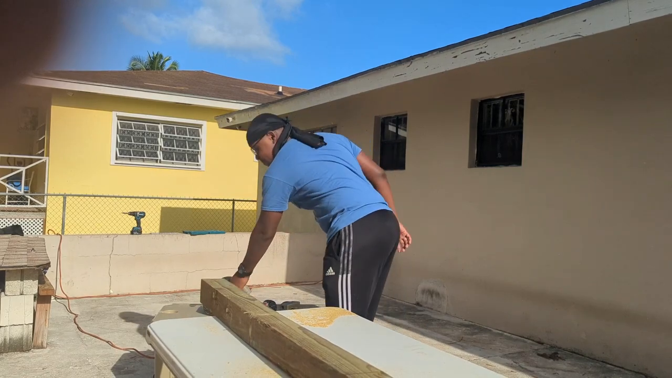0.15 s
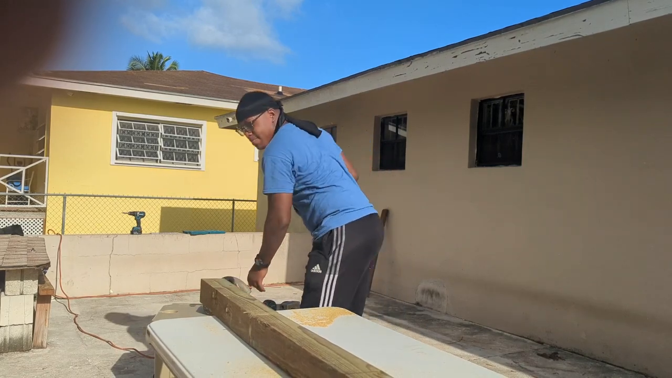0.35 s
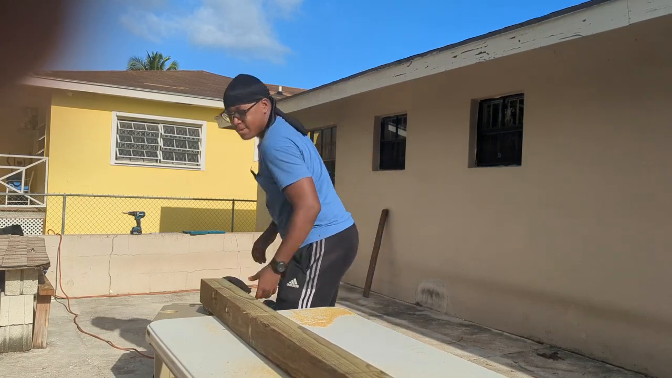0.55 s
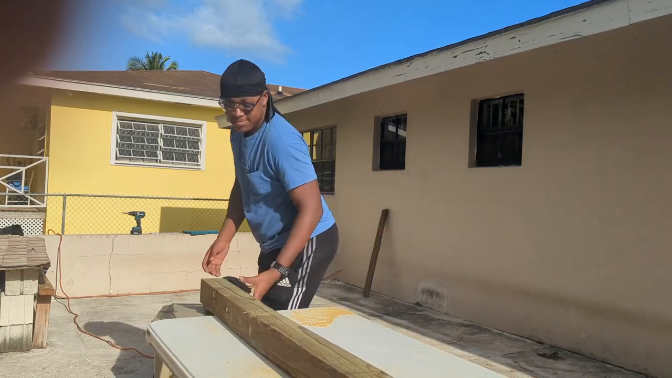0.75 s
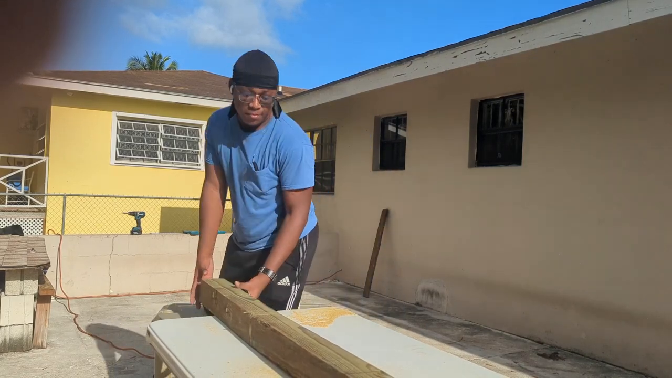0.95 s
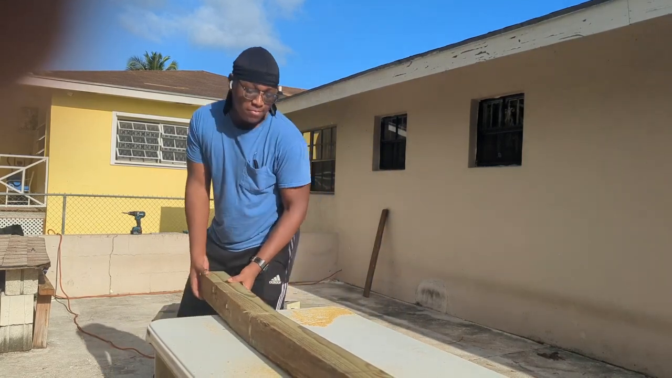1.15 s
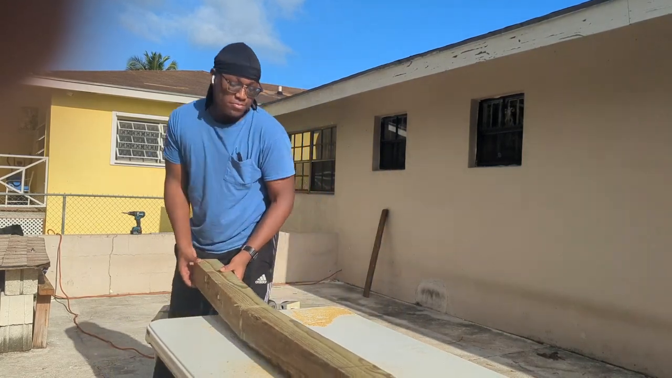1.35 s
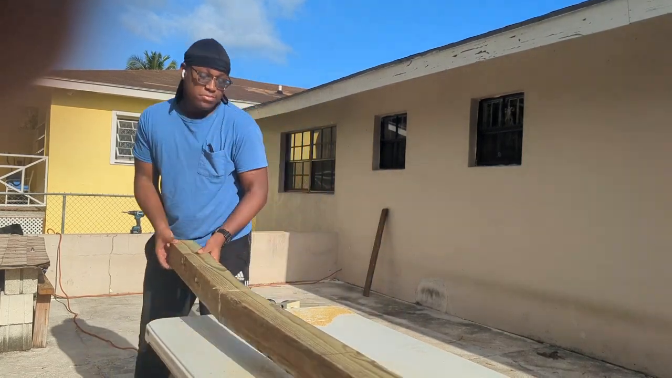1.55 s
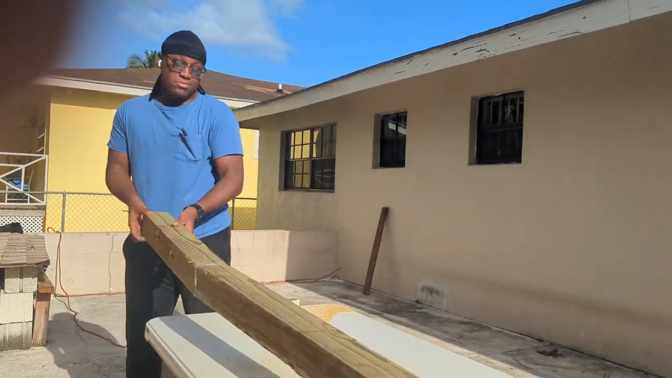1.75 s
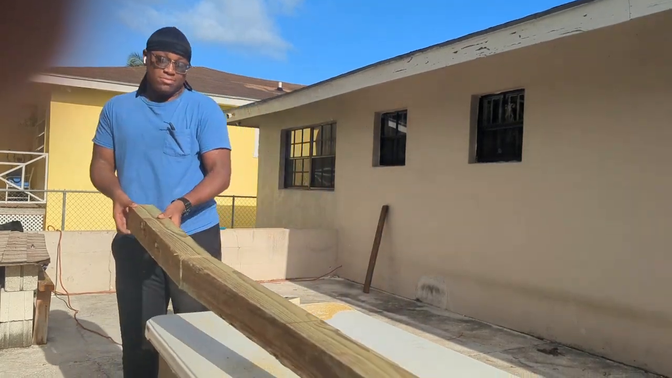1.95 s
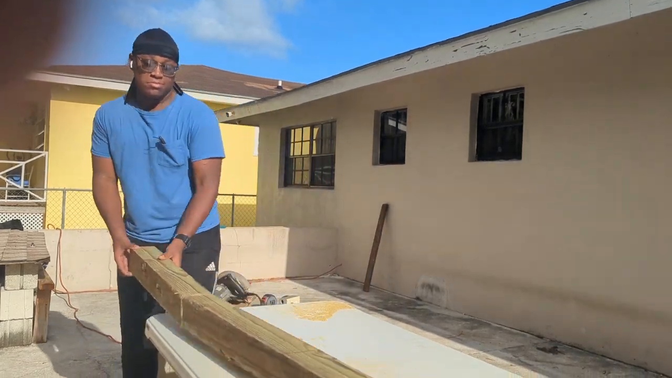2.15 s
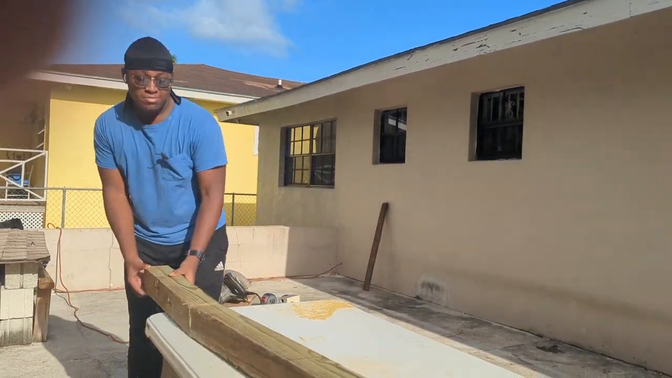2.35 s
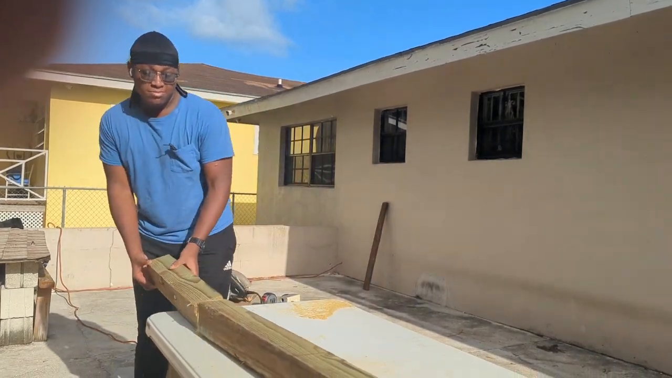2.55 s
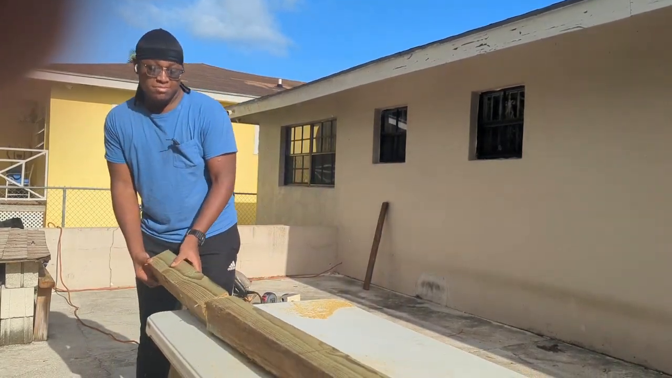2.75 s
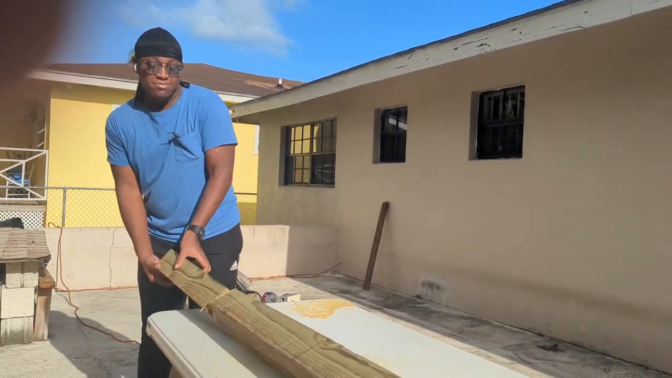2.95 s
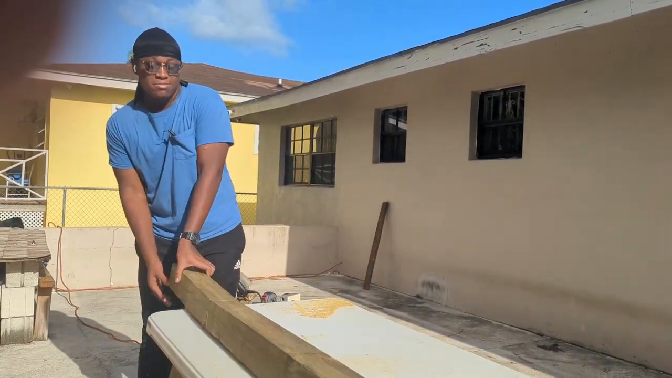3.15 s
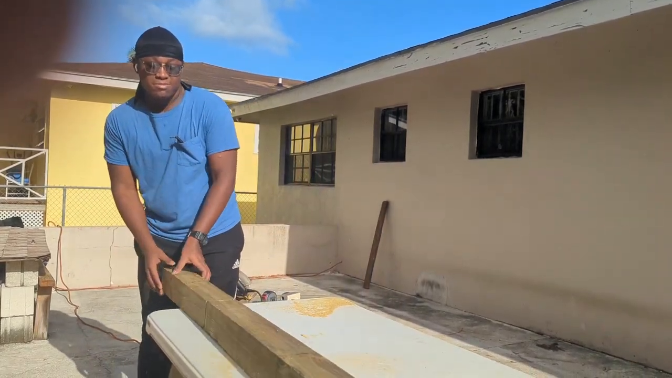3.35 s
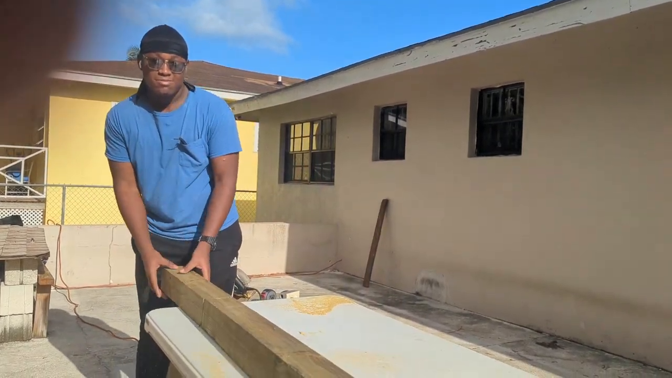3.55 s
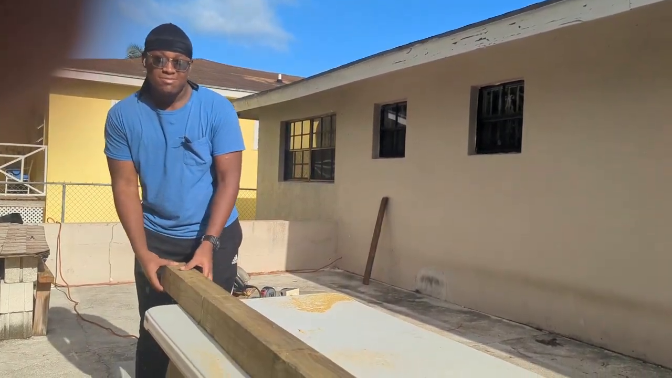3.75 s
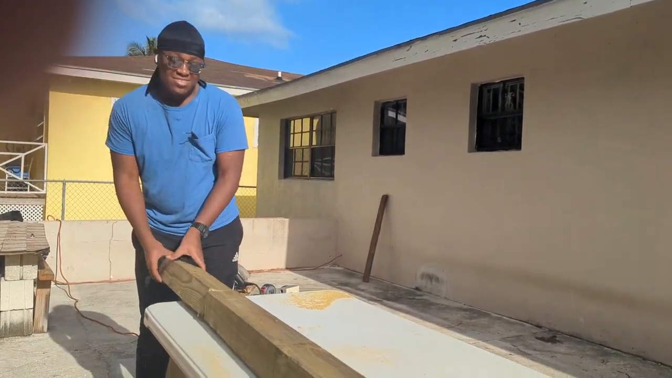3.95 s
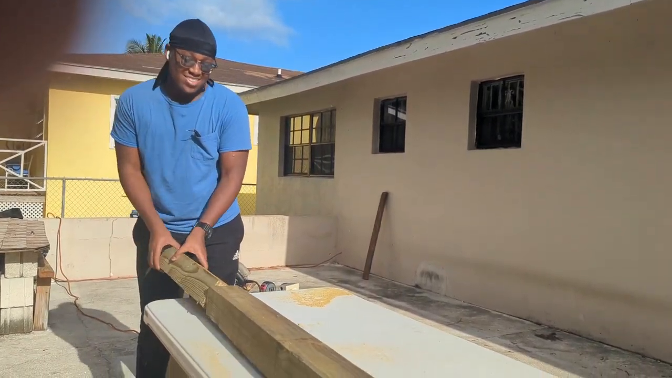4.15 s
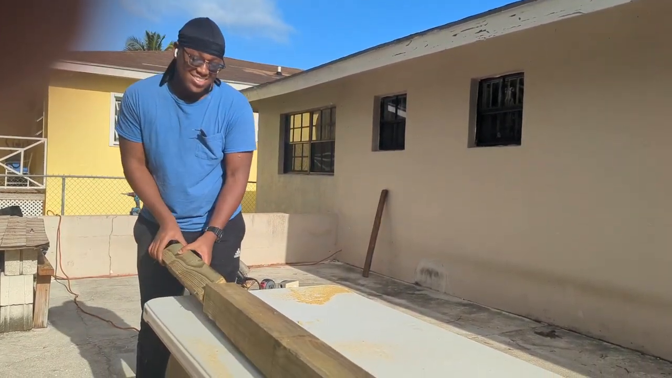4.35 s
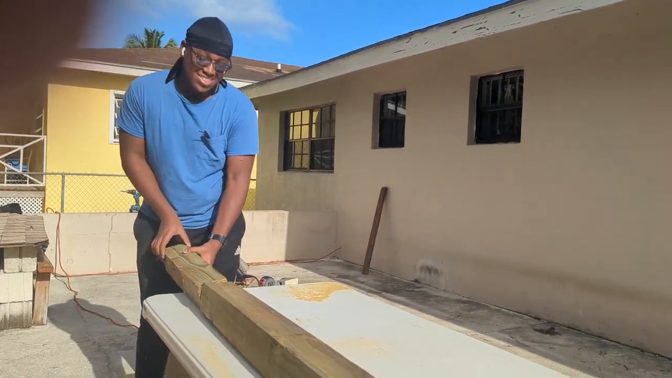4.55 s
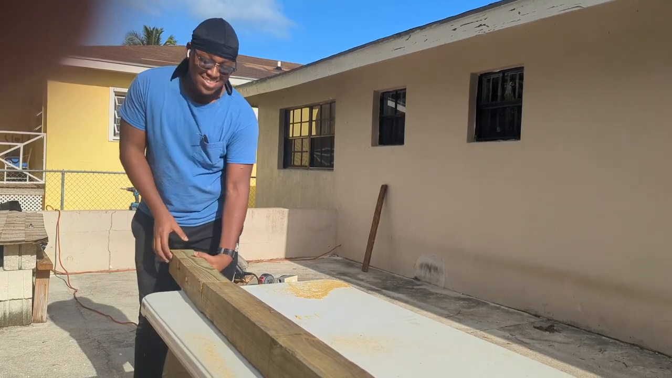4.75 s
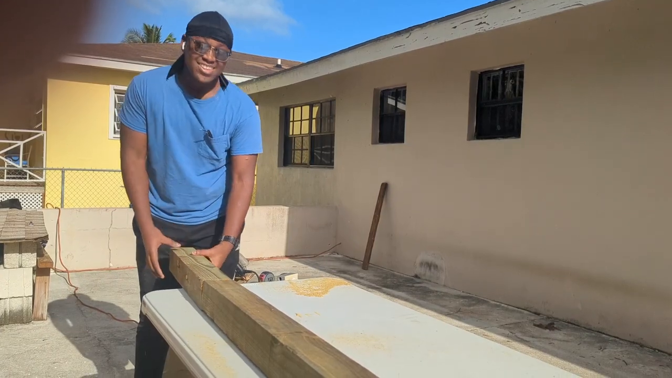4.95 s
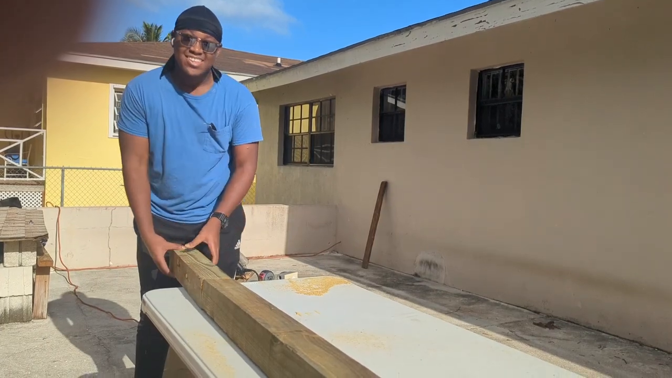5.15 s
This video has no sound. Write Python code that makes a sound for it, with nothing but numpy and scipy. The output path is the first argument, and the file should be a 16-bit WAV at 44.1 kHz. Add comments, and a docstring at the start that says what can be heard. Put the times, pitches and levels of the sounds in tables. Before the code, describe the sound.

A low rumble of distant traffic and a machine's hum run throughout in an outdoor yard. Right at the start, a heavy wooden post slides briefly on a plastic folding table close by, with a few dull, hollow bumps. From about 0.7 to 2.3 seconds there are only light tocks, small finger ticks and faint rubbing of hands and cloth. At 2.3 seconds the post is set down with a thump, followed at once by a sharp knock, and it creaks briefly on its edge around 2.6 seconds. After another faint tick and rub, it drops on its side at 3.3 seconds, the loudest moment: a quick cluster of hollow knocks running into a scrape that ends by about 3.7 seconds. House walls add a short, slight echo. A soft, low tock comes at 4.8 seconds, and the background hum carries on until about 5.5 seconds.

```python
"""In a yard, a heavy wooden post is shifted by hand on a plastic folding table. It slides, is lifted,
set down and rocked on its creaking edge, then dropped on its side and scraped along. Each knock and
each tiny slip makes post and table ring together. Hands tick and rub on the wood. House walls echo
briefly, and distant traffic and machinery hum behind it all."""
import sys
import numpy as np
from scipy import signal
from scipy.fft import rfft, irfft, next_fast_len
from scipy.io import wavfile
from scipy.ndimage import uniform_filter1d, map_coordinates

SR = 44100
rng = np.random.default_rng(int(sys.argv[2]) if len(sys.argv) > 2 else 0)


def wrap_up_sound(samples):
    """Save the sound to the file named by the first command line argument, as 16-bit audio."""
    columns = np.atleast_2d(samples).T
    # keep every value between -1 and 1, then stretch to whole-number steps
    tamed = np.clip(columns, -1, 1)
    steps = np.round(tamed * 32767).astype(np.int16)
    wavfile.write(sys.argv[1], SR, steps)


N = 233405
TIME = np.arange(N) / SR
RING_TIME = TIME[:SR // 2]  # half a second for a ring to die away

# stereo width of nearby sounds: (frequency [Hz], side minus middle [dB])
NEAR_WIDTH = [(30, -8), (60, -19), (120, -52), (200, -41), (380, -19.5), (700, -19), (1290, -19),
              (2380, -4), (4400, 2), (8000, -0.5), (15000, 5.5)]


def amp(db):
    """Turn decibels into a gain to multiply by."""
    return 10 ** (np.asarray(db) / 20)


def unit(x):
    """Scale a signal to an average (rms) level of 1."""
    return x / np.sqrt(np.mean(x ** 2) + 1e-20)


def unit_energy(x):
    """Scale a ring to an energy of 1 per channel, on average."""
    return unit(x) / np.sqrt(x.shape[-1])


def curve(points, hz):
    """Read between (frequency, value) points on a logarithmic frequency axis."""
    freqs, values = np.transpose(points)
    return np.interp(np.log(hz + 1), np.log(freqs + 1), values)


def wobble(rate):
    """A smooth random curve through `rate` new values a second."""
    return map_coordinates(rng.standard_normal(int(N * rate / SR) + 4), [TIME * rate])


def decay(t, fade_s):
    """A fade. Every fade time here is the time it takes to fall by 60 dB."""
    return np.exp(-np.log(1000) * t / fade_s)


def stroke(start_s, length_s, rise_s, fade_s):
    """The strength of one movement: it rises, holds and dies away."""
    t = TIME - start_s
    return np.clip(t / rise_s, 0, 1) * decay(np.maximum(t - length_s, 0), fade_s)


def filtered(x, gain_at):
    """Give each frequency of a signal its own gain."""
    size = next_fast_len(x.shape[-1] + SR // 4)
    return irfft(rfft(x, size) * gain_at(np.fft.rfftfreq(size, 1 / SR)), size)[..., :x.shape[-1]]


def keep_band(x, edge_hz, kind, order=4):
    """Keep the low, middle or high part of a signal."""
    return signal.sosfilt(signal.butter(order, edge_hz, kind, fs=SR, output="sos"), x)


def stereo_angle(width, hz):
    """How wide a frequency sounds, as an angle; 0 is dead centre."""
    return np.arctan(amp(curve(width, hz)))


def noise(db_at, width, size):
    """Stereo noise of level 1, coloured by a function from frequency to dB."""
    def gains(hz):
        angle = stereo_angle(width, hz)
        return amp(db_at(hz)) * [np.cos(angle), np.sin(angle)]
    middle, side = filtered(rng.standard_normal((2, size)), gains)
    return unit(np.array([middle + side, middle - side]))


def dense_ring(db_at, fades):
    """A noisy stereo ring in which each frequency dies at its own speed."""
    hz, t, spectrum = signal.stft(noise(db_at, NEAR_WIDTH, len(RING_TIME)), SR, nperseg=256)
    _, ring = signal.istft(spectrum * decay(t, curve(fades, hz)[:, None]), SR, nperseg=256)
    return unit_energy(ring[:, :len(RING_TIME)])


def add(track, start_s, sound):
    """Mix a sound into the track at the given time."""
    part = track[:, max(round(start_s * SR), 0):][:, :sound.shape[-1]]
    part += sound[..., :part.shape[-1]]


def excite(x, ring):
    """Let every sample of x set off a stereo ring (convolution)."""
    return signal.fftconvolve(np.atleast_2d(x), ring, axes=1)[:, :N]


def traffic_and_machine(rumble_db=-40.5, hiss_db=-52, drift_hz=1):
    """Far traffic rumbles and hisses around the unsteady hum of a machine."""
    # colours of the traffic's rumble and hiss: (frequency [Hz], level [dB])
    rumble_colour = [(15, 2), (38, -1), (50, 2), (75, -1.5), (105, 3), (135, -3), (190, -1), (240, -7),
                     (320, -12.5), (450, -22), (900, -57), (2000, -120)]
    hiss_colour = [(180, -18), (300, -11.5), (404, 0.5), (553, -7.5), (591, -4), (865, -5.5), (940, -6.5),
                   (1090, -8), (1310, -9), (2010, -11), (3040, -17.5), (4100, -19), (6620, -34.5),
                   (12400, -38.5), (15700, -83)]
    # the machine's tones: (pitch [Hz], level [dB])
    tones = [(81, -44.5), (188, -54), (915, -71), (1561, -74), (12030, -95)]
    # stereo width of distant sounds: (frequency [Hz], side minus middle [dB])
    far_width = [(25, -7.5), (70, -16), (150, -43), (300, -21.5), (640, -17), (1410, -10.5), (3100, 4),
                 (7000, -0.5), (15000, 4.5)]
    rumble = amp(rumble_db + wobble(6.095)) * noise(lambda hz: curve(rumble_colour, hz), far_width, N)
    hiss = amp(hiss_db + 0.78 * wobble(5.37)) * noise(lambda hz: curve(hiss_colour, hz), far_width, N)
    hum = 0
    for hz, db in tones:
        level = amp(db + 2 * wobble(4.935))
        pitch = hz + drift_hz * wobble(4.2)
        hum += level * unit(np.sin(2 * np.pi * np.cumsum(pitch) / SR))
    return rumble + hiss + hum


def contact(time_s, db, hardness_db, bass_loss=0.36):
    """Give the move under way and its low, middle and high gains: harder is brighter and thinner."""
    # the post presses on a different part of the table in each move (slide, set-down, drop):
    # (start [s], bass [dB], treble [dB])
    moves = [(0, 10.5, -13.5), (2.2, 6, -7), (3.1, 0, -3)]
    move = sum(time_s >= row[0] for row in moves[1:])
    _, bass_db, treble_db = moves[move]
    return move, amp(db + np.array([bass_db - bass_loss * hardness_db, 0, treble_db + hardness_db]))


def post_and_table(move, gains, dense_db=3, scatter_db=2.5, low_hz=270, high_hz=3000, give_s=0.00037):
    """Post and table top ring together, a little differently at each spot that is touched."""
    # their main tones: (pitch [Hz], fade [s], slide level [dB], set-down level [dB], drop level [dB])
    tones = [(84, .14, -4, -9, -11), (118, .15, -7, -2, 3), (168, .14, 2, -14, -11), (205, .1, -9, -8, -2),
             (325, .11, -20, -8, -11), (400, .09, -26, -14, -7), (569, .09, -20, -24, -14),
             (698, .1, -16, -19, -7), (835, .08, -22, -21, -12), (1112, .1, -22, -19, -16),
             (1255, .08, -24, -23, -15), (1535, .08, -24, -11, -13), (1770, .1, -23, -24, -13),
             (1990, .06, -19, -19, -19), (2229, .06, -22, -23, -22), (2500, .04, -18, -28, -25),
             (3268, .5, -46, -36, -27), (3620, .13, -38, -24, -21), (4005, .13, -34, -19, -17),
             (4235, .15, -42, -17, -20), (5210, .06, -48, -23, -27), (6600, .12, -56, -42, -36),
             (8000, .06, -56, -37, -37), (10700, .13, -60, -46, -41)]
    # the crowd of tones between those, one list per move: (frequency [Hz], level [dB])
    dense_colours = [
        [(20, -8), (45, -15), (100, 4), (200, -12), (300, -15.5), (440, -24), (700, -18.5), (2400, -22.5),
         (3200, -30.5), (4300, -28.5), (6000, -39.5), (15000, -54)],
        [(20, 0), (50, -17), (110, 4), (300, -5.5), (500, -5), (1000, -5.5), (2100, -9.5), (2800, -17),
         (4000, -9.5), (6000, -29), (11000, -36), (15500, -61)],
        [(20, -27), (45, -17), (110, -1), (300, -2), (700, -6), (1700, -6), (2700, -16.5), (4000, -12.5),
         (5500, -22), (8000, -27.5), (11000, -32), (13000, -38.5), (15500, -46)],
    ]
    # how long that crowd rings: (frequency [Hz], fade [s])
    dense_fades = [(100, 0.15), (700, 0.16), (3000, 0.11), (12000, 0.11)]
    ring = amp(dense_db) * dense_ring(lambda hz: curve(dense_colours[move], hz), dense_fades)
    for hz, fade_s, *move_db in tones:
        scatter, lean = rng.standard_normal(2)
        # short waves reach the left and right microphone openings out of step
        phase = np.sign(lean) * stereo_angle(NEAR_WIDTH, hz) * np.array([[1], [-1]])
        tone = np.sin(2 * np.pi * hz * RING_TIME + phase) * decay(RING_TIME, fade_s)
        ring += amp(move_db[move] + scatter_db * scatter) * unit_energy(tone)
    ring *= 1 - np.exp(-RING_TIME / give_s)  # the plastic gives way for a moment
    ring = keep_band(ring, 27, "highpass", order=2)  # the table is too small to give off deep bass
    bands = [(low_hz, "lowpass"), ([low_hz, high_hz], "bandpass"), (high_hz, "highpass")]
    return sum(gain * unit_energy(keep_band(ring, *band)) for gain, band in zip(gains, bands))


def scrapes(slips_per_s=450, scatter_db=5.0, fine_share=0.3, clump_db=3, slowing_db_per_s=40.5):
    """The grain sticks and slips in uneven clumps, ringing new spots as the post travels and slows."""
    # slides of the post: (start [s], length [s], pressure [dB], hardness [dB])
    slides = [(0, 0.15, -36, 0), (2.359, 0.072, -38.5, 0), (2.416, 0.043, -40, 6.5), (3.312, 0.12, -25, 0),
              (3.448, 0.071, -29.5, -1), (3.57, 0.027, -43.5, 0.5)]
    slips = rng.random(N) < slips_per_s / SR
    slips = slips * amp(scatter_db * np.clip(rng.standard_normal(N), -2, 2))
    clumps = amp(clump_db * wobble(130))
    force = clumps * (unit(slips * rng.choice([-1, 1], N)) + fine_share * rng.standard_normal(N))
    spot = SR // 25  # samples it takes to cross one spot
    force /= np.sqrt(abs(uniform_filter1d(force ** 2, spot)) + 1e-9)  # weight steadies the friction
    stop_s = 0.125
    out = np.zeros((2, N))
    for start_s, length_s, db, hardness_db in slides:
        move, gains = contact(start_s, db, hardness_db)
        slowing = amp(-slowing_db_per_s * np.clip(TIME - start_s, 0, length_s))
        speed = stroke(start_s, length_s, rise_s=0.0079, fade_s=stop_s) * slowing
        for centre in range(int(start_s * SR), int((start_s + length_s + stop_s / 2) * SR), spot):
            span = np.arange(max(centre - spot, 0), centre + spot)
            load = np.cos(np.pi / 2 * (span - centre) / spot)  # the weight rolls on to the next spot
            push = force[span] * speed[span] * load
            add(out, span[0] / SR, excite(push, post_and_table(move, gains)))
    return out


def knocks(contact_s=0.0044):
    """Flat landings thump and hard corners crack; each strikes a new spot."""
    # the post hits the table: (time [s], force [dB], hardness [dB])
    hits = [(0.002, -26, 3.5), (0.033, -35.5, -3), (0.057, -36, 7), (0.081, -34, -10), (0.118, -29, 1),
            (2.344, -33, -8), (2.348, -23.5, -10), (2.407, -35, 8), (2.428, -27, 12.5), (3.29, -16, -7),
            (3.301, -10, -11), (3.311, -12.5, -1), (3.331, -17.5, 4.5), (3.345, -19, -18),
            (3.415, -21, -17), (3.461, -21.5, -5), (4.845, -47, -52)]
    out = np.zeros((2, N))
    for time_s, db, hardness_db in hits:
        move, gains = contact(time_s, db, hardness_db)
        add(out, time_s, post_and_table(move, gains))
    return np.sqrt(contact_s * SR) * out  # energy grows with the contact time


def resonance(pitch, fade_s, falloff_db, tone_share, rise_s=0.00018):
    """One tone rings along with its neighbours, a narrow band of noise."""
    neighbours = noise(lambda hz: -falloff_db * np.log2((hz + 1) / pitch) ** 2,
                       NEAR_WIDTH, len(RING_TIME))
    ring = unit(neighbours + tone_share * np.sin(2 * np.pi * pitch * RING_TIME))
    return ring * decay(RING_TIME, fade_s) * (1 - np.exp(-RING_TIME / rise_s))


def edge_catches():
    """The post's edge catches lightly on the plastic and rings one tone: a short 'tock'. The ring at 2.416 s is
    instead a hard hit that sets a high tone of the post ringing."""
    # catches of the edge, and at 2.416 s a hard hit ringing a high tone of the post: (time [s], level [dB],
    # pitch [Hz], fade [s])
    catches = [(0.671, -40, 1220, .049), (1.3156, -35.5, 1610, 0.026), (2.416, -34, 4160, 0.13),
               (2.428, -22.5, 1504, 0.071), (2.429, -35.5, 5300, 0.096), (4.802, -32, 296, 0.088)]
    out = np.zeros((2, N))
    for time_s, db, pitch, fade_s in catches:
        add(out, time_s, amp(db) * resonance(pitch, fade_s, falloff_db=18, tone_share=1.4))
    return out


def hands(tick_fade_s=0.031, tick_rise_s=0.00093, tick_boost_db=3, settle_s=0.018, settle_db=-12):
    """Skin and cloth rub faintly; a finger ticks twice, as it lands and as it settles."""
    # palms and shirt rub as the grip shifts: (start [s], length [s], level [dB])
    rubs = [(1.433, 0.69, -64.5), (2.506, 0.17, -64.5), (3.17, .2, -63.5)]
    # fingers and splinters tick on the wood: (time [s], snap level [dB], ring above the snap [dB])
    ticks = [(0.846, -58.5, 4), (1.498, -52, -18), (1.623, -55, 14), (1.916, -52.5, -9),
             (2.000, -55.5, 16.5), (2.042, -48, 17.5), (2.062, -49.5, 6), (2.280, -45.5, -6),
             (2.350, -37, -8), (2.584, -51.5, 3.5), (2.63, -52.5, 12), (3.007, -47.5, -9)]
    # colours of the rub, a tick's snap and its wooden ring: (frequency [Hz], level [dB])
    rub_colour = [(1000, -25), (3500, 17.5), (8000, 2.5), (12000, -5), (16000, -24)]
    snap_colour = [(2000, -30), (5000, 0), (8500, 1), (11000, -4), (16000, -13)]
    ring_colour = [(300, -35), (700, -9), (1200, -16), (2000, -7), (2700, -8), (3500, 0), (4050, 0),
                   (4600, -11), (5500, -20), (12000, -45)]
    rubbing = sum(amp(db) * stroke(start_s, length_s, rise_s=0.085, fade_s=1)
                  for start_s, length_s, db in rubs)
    roughness = amp(2 * wobble(38.54))
    out = rubbing * roughness * noise(lambda hz: curve(rub_colour, hz), NEAR_WIDTH, N)
    shape = amp(tick_boost_db) * decay(RING_TIME, tick_fade_s) * (1 - np.exp(-RING_TIME / tick_rise_s))
    for time_s, db, ring_db in ticks:
        for delay_s, touch_db in [(0, 0), (settle_s, settle_db)]:
            snap = noise(lambda hz: curve(snap_colour, hz), NEAR_WIDTH, len(RING_TIME))
            ring = noise(lambda hz: curve(ring_colour, hz), NEAR_WIDTH, len(RING_TIME))
            add(out, time_s + delay_s, amp(db + touch_db) * shape * (snap + amp(ring_db) * ring))
    return out


def creak():
    """The post rocks on its edge and slips three times, ringing the same few tones each time."""
    # slips of the edge: (time [s], level [dB], brightness [dB per octave])
    slips = [(2.585, -36.5, 0), (2.604, -36, 1), (2.628, -29, -5)]
    # tones of the creak: (pitch [Hz], level [dB], fade [s])
    tones = [(702, -2.5, .11), (1410, -1, 0.069), (2025, 1, 0.056)]
    out = np.zeros((2, N))
    for time_s, db, brightness in slips:
        for hz, tone_db, fade_s in tones:
            octaves = np.log2(hz / tones[0][0])
            ring = resonance(hz, fade_s, falloff_db=34, tone_share=1.5)
            add(out, time_s, amp(db + tone_db + brightness * octaves) * ring)
    return out


def scene(echo_db=-19, echo_delay_s=0.014):
    """Mix the background, the handling of the post and its echo from the house walls."""
    # how long the yard echoes: (frequency [Hz], fade [s])
    yard_fades = [(150, 0.76), (1500, 0.33), (5000, 0.22), (12000, 0.097)]
    background = traffic_and_machine()
    near = hands() + edge_catches() + creak() + knocks() + scrapes()
    out = near + background
    echo = excite(near, dense_ring(np.zeros_like, yard_fades))
    add(out, echo_delay_s, amp(echo_db) * echo)
    return out


def record(dry, top_hz=15820):
    """The two microphone openings colour the sound a little differently; the highest treble is cut."""
    # balance between the openings: (frequency [Hz], left minus right [dB])
    balance = [(700, 0.23), (1300, 0), (2300, 4), (4400, -3), (9000, -0.5), (15000, 4)]
    left_right = np.array([[1], [-1]])
    return filtered(dry, lambda hz: amp(curve(balance, hz) / 2 * left_right) * (hz < top_hz))


dry = scene()
out = record(dry)
wrap_up_sound(out)
```